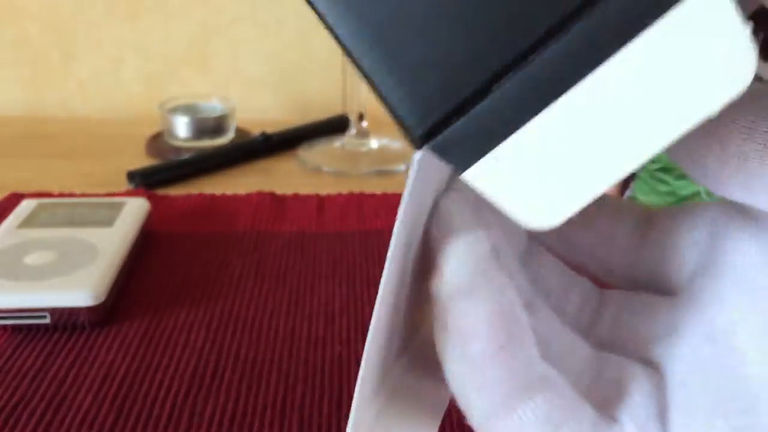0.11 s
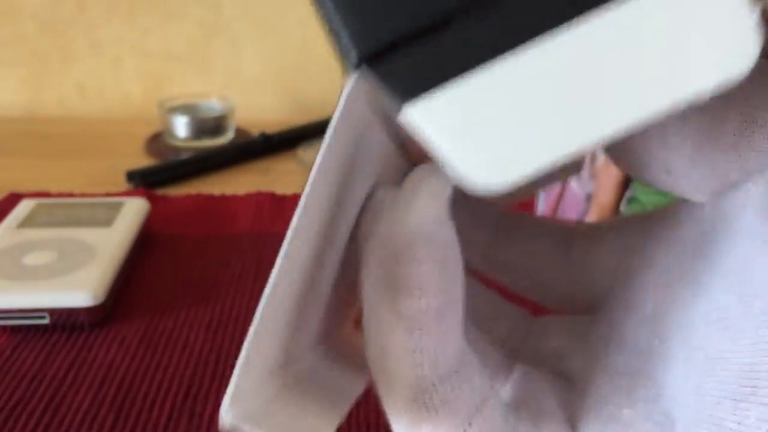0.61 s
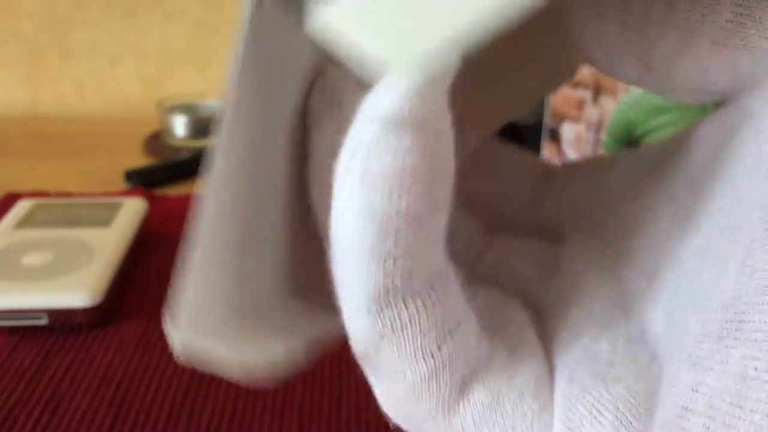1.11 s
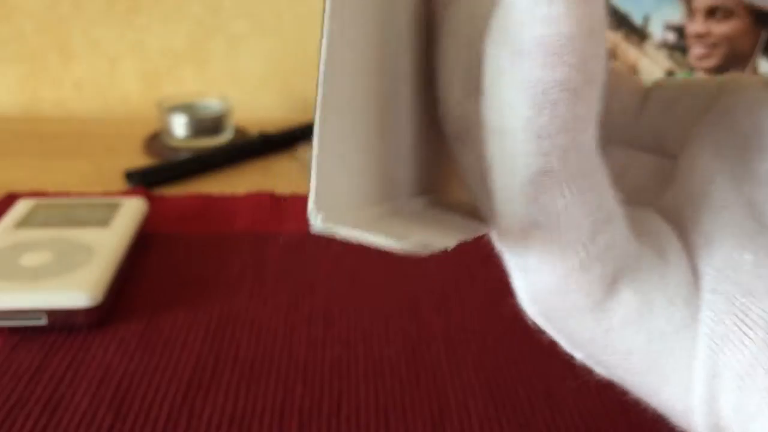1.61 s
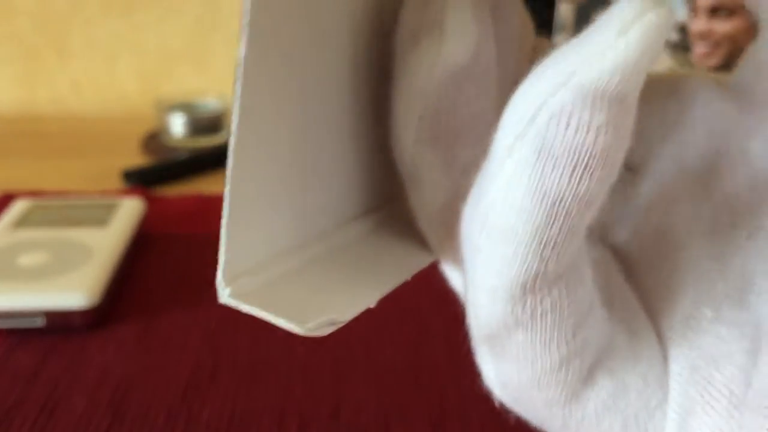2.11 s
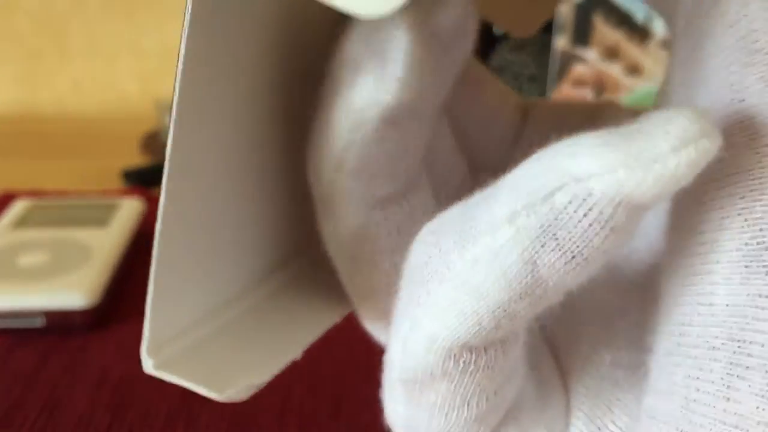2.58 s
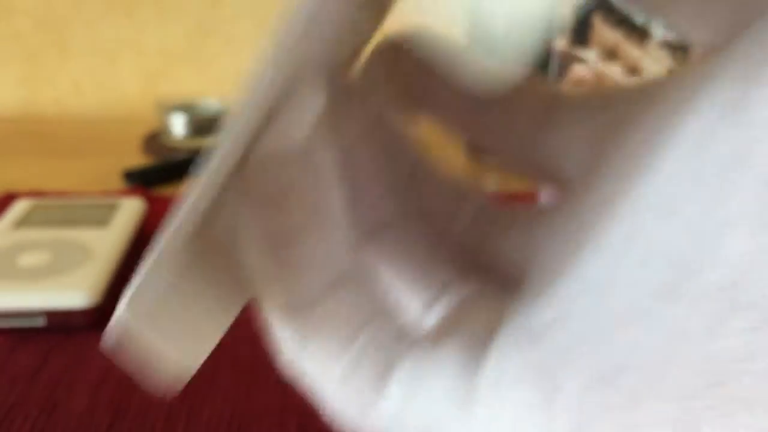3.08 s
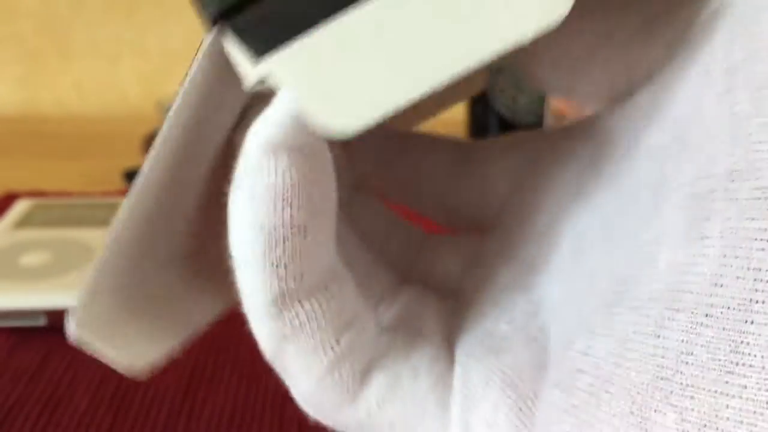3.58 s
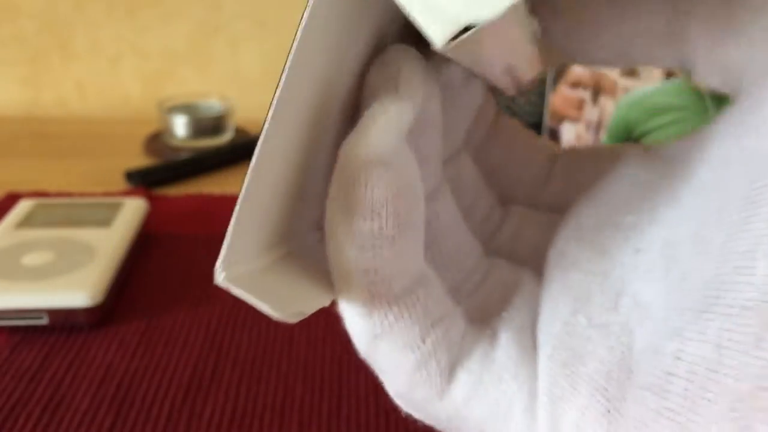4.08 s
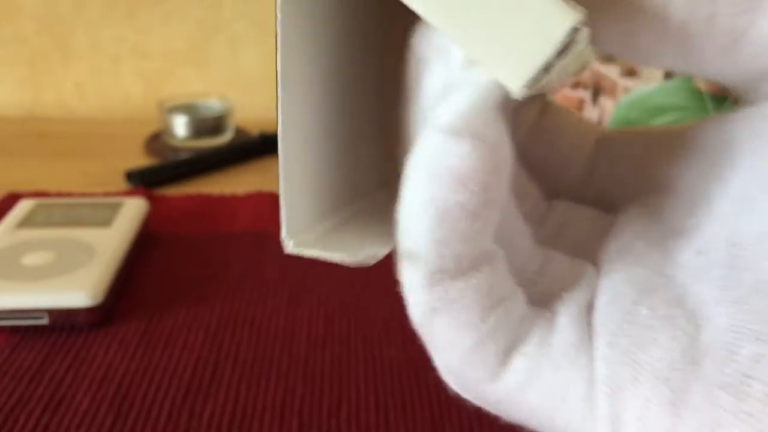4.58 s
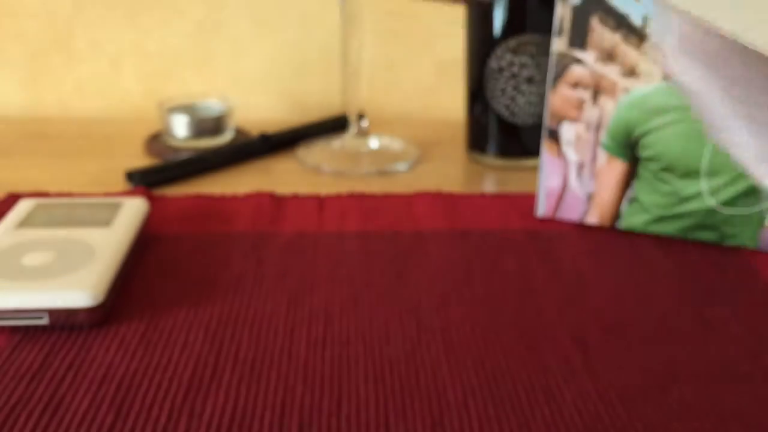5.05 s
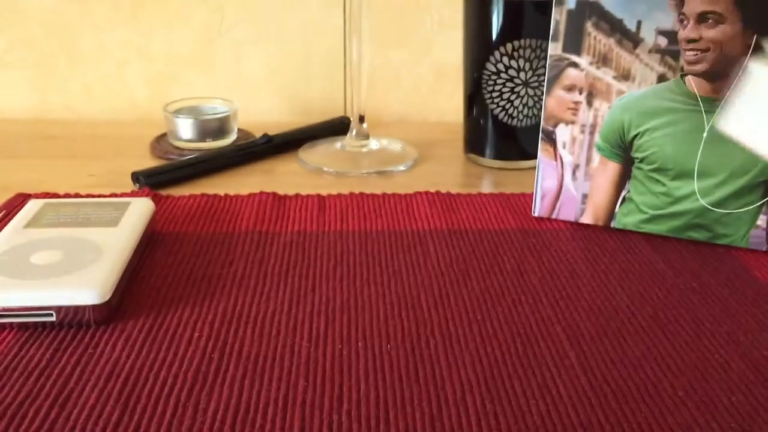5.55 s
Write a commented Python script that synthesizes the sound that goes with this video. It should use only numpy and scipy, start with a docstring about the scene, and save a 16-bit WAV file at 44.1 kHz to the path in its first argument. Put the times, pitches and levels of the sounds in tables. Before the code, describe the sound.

Close, dry scraping and rustling of fabric gloves on a thin card box, broken by muffled knocks and two sharper hollow bumps.

```python
"""Quiet room: cotton-gloved hands work a small cardboard box close to one microphone.
Short rubbing strokes are shaped noise: card and cavity resonances, crackling fibre hiss, drumming panels.
Fingertip knocks and whole-box thumps are decaying sines; snapping edges are brief rings with noise cracks.
A short noise-tail echo and a steady shaped-noise floor surround them."""
import sys
import numpy as np
from scipy import signal
from scipy.fft import rfft, irfft, next_fast_len
from scipy.io import wavfile
from scipy.ndimage import uniform_filter1d, map_coordinates

SR = 44100
rng = np.random.default_rng(int(sys.argv[2]) if len(sys.argv) > 2 else 0)


def wav_record(signal):
    """Record a signal, one row per channel, as 16-bit PCM in the file named by sys.argv[1]."""
    frames = np.transpose(np.atleast_2d(signal))
    bounded = np.clip(frames, -1, 1)
    # unit amplitude maps onto the largest positive 16-bit level
    quanta = np.round(bounded * 32767).astype(np.int16)
    wavfile.write(sys.argv[1], SR, quanta)


def voltage_ratio(decibels):
    """Convert decibels (scalar or array-like) to amplitude ratios, 20 dB per decade."""
    exponent = np.asarray(decibels, float) / 20
    return 10 ** exponent


N = 250488

# glove strokes: full_pressure_start_s, held_s, rub_db, hiss_over_rub_db, drum_db
STROKES = [(0.042, 0.025, -57, 0.5, -64), (0.163, 0.049, -56.5, 9, -51), (0.23, 0.018, -49, 2.5, -49.5),
           (.285, 0.068, -52, 0, -50.5), (0.382, 0.0023, -45.5, -6.5, -44.5), (0.433, 0.045, -51, 1, -54.5),
           (.5, 0.08, -62, -1, -61.5), (0.599, 0.011, -56, -8, -53.5), (0.673, 0.027, -52.5, -0.5, -53),
           (.72, 0.027, -65, 3.5, -63.5), (0.818, 0.042, -55, 2, -48.5), (.915, 0.033, -56.5, 4.5, -48),
           (.965, 0.099, -58.5, -4.5, -59), (1.014, 0.0019, -51.5, -0.5, -43.5),
           (1.107, 0.0011, -43.5, 1, -38), (1.159, 0.03, -49.5, 2, -44), (1.27, 0.023, -52, -1.5, -60),
           (1.57, 0.0064, -64.5, 0, -58), (1.756, 0.081, -67, 5, -68.5), (1.846, 0.0096, -54.5, -11, -58.5),
           (1.995, 0.016, -63, -3, -60), (2.151, 0.11, -54.5, -2, -59), (2.386, 0.011, -82, 8, -58),
           (2.471, 0.055, -66, -5, -58), (2.594, 0.0029, -42.5, -3.5, -36), (2.63, .17, -57, -8, -56),
           (2.674, 0.054, -49, -4.5, -70), (2.818, 0.061, -47.5, 3, -60), (2.886, 0.064, -50.5, 0.5, -60),
           (3.087, 0.072, -48.5, 1, -53.5), (3.16, .002, -42.5, -4, -41), (3.175, 0.021, -56.5, -1, -43),
           (3.215, 0.021, -50.5, -5.5, -54), (3.246, 0.029, -48, -1, -38.5), (3.337, 0.074, -46, -1, -57),
           (3.387, 0.033, -50.5, -1, -41.5), (3.486, 0.012, -49, 0.5, -42), (3.555, 0.031, -54.5, 1, -53),
           (3.59, 0.011, -48, -2, -41.5), (3.658, 0.012, -51.5, -2.5, -45.5), (3.758, 0.016, -59.5, 7, -50),
           (3.828, 0.0053, -59, 2, -45.5), (3.875, .03, -74.5, 14.5, -80), (3.916, 0.0086, -53.5, 2.5, -50),
           (4.05, 0.082, -49, -7, -56.5), (4.149, 0.0057, -54, -9, -54.5), (4.31, 0.064, -58, -5.5, -79),
           (4.476, 0.035, -56, -7.5, -59.5), (4.532, 0.15, -49, -5.5, -62),
           (4.62, 0.017, -47.5, -16, -44.5), (4.66, 0.1, -52.5, -9.5, -66), (4.73, 0.049, -51, -13, -58.5),
           (4.79, 0.14, -58, 0, -64.5), (4.929, 0.047, -51, -3, -58), (4.994, 0.0029, -49, -2.5, -43.5),
           (5.038, 0.02, -51.5, -3.5, -53.5), (5.09, 0.028, -52.5, -10, -62),
           (5.148, 0.0026, -58, 8.5, -48), (5.21, 0.021, -68.5, -11, -55.5), (5.36, .12, -75.5, 7, -92)]
# box panel modes: pitch_hz, relative_level_db, t60_s
PANELS = [(70, -7, 0.042), (134, -1.5, 0.028), (226, -2, 0.039), (290, 0.5, 0.11), (400, -0.5, 0.045),
          (523, -3, 0.025), (590, -1.5, 0.041), (731, -10, 0.026)]


def unit(x):
    """Scale to unit rms."""
    return x / np.sqrt(np.mean(x ** 2) + 1e-20)


def along(points, hz):
    """Interpolate (hz, value) points on a log frequency axis."""
    f, v = np.transpose(points)
    return np.interp(np.log(hz + 1), np.log(f + 1), v)


def filtered(x, response):
    """Multiply the spectrum of x by a complex response of frequency."""
    m = next_fast_len(N + 8192)
    return irfft(rfft(x, m) * response(np.fft.rfftfreq(m, 1 / SR)), m)[:N]


def resonance(f, hz, width_hz):
    """Second-order bandpass response with unit gain at hz."""
    return 1j * f * width_hz / (hz * hz - f * f + 1j * f * width_hz)


def strokes():
    """Glove scrapes card: friction noise excites card and inner air, hisses in the fibres and drums the panels."""
    # grip: start_s, panel_hz, card_hz, hiss_hz, top_edge_tilt_db, hollow_over_rub_db
    grip = [(0, 400, 1680, 3600, -12, -6), (.2, 298, 1700, 5000, 1, -34), (.72, 255, 1380, 4300, -4.5, -13),
            (1.3, 232, 2350, 4400, 4.5, -33), (1.75, 334, 1390, 4400, -9, -3.5),
            (1.84, 266, 1460, 5550, -6, -14), (2.1, 400, 1080, 4970, -7, -35),
            (2.55, 400, 1080, 5740, -9, -1), (2.72, 290, 2220, 5350, 3, -25),
            (2.84, 400, 1130, 5470, -4.5, -7), (2.971, 400, 1180, 5530, 0, -7.5),
            (3.1, 240, 1600, 4470, -1.5, -28.5), (3.6, 248, 1950, 4400, -1.5, -12),
            (3.8, 225, 2150, 5740, 1, -18), (3.9, 230, 1570, 3870, -6, -11),
            (4.05, 400, 1650, 5200, 5, -19), (4.35, 396, 2250, 3430, 3.5, -45),
            (4.52, 430, 1930, 5500, -1, -10.5), (4.8, 417, 1910, 6100, 7, -8.5),
            (5.05, 358, 2190, 5900, 1, -56), (5.22, 194, 1170, 5000, 4, 6.5),
            (5.45, 215, 2870, 2870, 0, -22)]
    # card resonances: centre_hz, width_hz, gain_over_rub_db
    card_modes = [(1185, 260, -8.5), (1705, 99, 1), (2190, 28, -1), (2480, 400, 1.5)]
    # rub spectrum: frequency_hz, relative_density_db
    rub_spectrum = [(500, -3), (800, 4.5), (1500, 2), (3000, -1.5), (4000, -4.5)]
    # hiss spectrum: frequency_hz, relative_density_db
    hiss_spectrum = [(1760, -43), (3000, -4), (3970, -7), (4340, -7), (4880, -13), (5590, -7.5),
                     (9410, -11), (10400, -17), (11300, -13), (14500, -14.5), (15400, -21)]
    rub_db, hiss_over_rub_db, drum_db = np.transpose(STROKES)[2:]
    grip_s, panel_hz, card_hz, hiss_hz, edge_db, hollow_db = np.transpose(grip)

    def near(centre_hz, gain_db, q):
        """Spectral gain peaking at a centre that follows the grip."""
        def favour(f, t):
            centre = np.interp(t, grip_s, centre_hz)
            return 1 + voltage_ratio(gain_db) * abs(resonance(f, centre, centre / q)) ** 2
        return favour

    def card(f):
        modes = sum(voltage_ratio(db) * abs(resonance(f, hz, width)) ** 2 for hz, width, db in card_modes)
        return voltage_ratio(along(rub_spectrum, f)) * (1 + modes)

    force = fibres(rough_db=1.5, rate_hz=480)
    rub = patches(filtered(force, card), near(card_hz, 27, 0.74), patchy_db=4.0)
    hollow = unit(filtered(force, lambda f: resonance(f, 974.0, 102) ** 2))  # air inside the box

    rasp = near(hiss_hz, 6, 5)

    def bright(f, t):
        octaves_up = np.clip(np.log2((f + 1) / 6000), 0, 1)
        return rasp(f, t) * voltage_ratio(np.interp(t, grip_s, edge_db) * octaves_up)

    grains = crackle() * fibres(rough_db=-0.5, rate_hz=820)
    hiss = patches(filtered(grains, lambda f: voltage_ratio(along(hiss_spectrum, f))), bright, patchy_db=4.0)

    def panel_ring(f):
        modes = 0
        for k, (hz, db, t60_s) in enumerate(PANELS):
            width_hz = 3 * np.log(10) / np.pi / t60_s
            modes = modes + (-1) ** k * voltage_ratio(db) * resonance(f, hz, width_hz)
        return modes

    drum = filtered(fibres(rough_db=4, rate_hz=59), panel_ring)
    drum = patches(drum, near(panel_hz, 6.0, 7.8), patchy_db=2.0)

    body = rub + voltage_ratio(np.interp(np.arange(N) / SR, grip_s, hollow_db)) * hollow
    # steeper: (rise, fall) slopes relative to those of the rub
    return (level(rub_db, steeper=(1, 1), creep_over_rub_db=0) * body
            + level(rub_db + hiss_over_rub_db, steeper=(0.82, 1.7), creep_over_rub_db=-3.5) * hiss
            + level(drum_db, steeper=(1.45, 1.08), creep_over_rub_db=-9) * drum)


def fibres(rough_db, rate_hz):
    """Friction force: noise whose size varies at random as fibres catch, rate_hz knots a second."""
    knots = rng.standard_normal(N // 8)
    catch = map_coordinates(knots, [np.arange(N) * rate_hz / SR])
    return unit(rng.standard_normal(N) * voltage_ratio(rough_db * catch))


def crackle():
    """Gain on the friction force: 1 plus sparse random one-millisecond bursts."""
    bursts_per_s, least_db, spread_db = 30, 1, 3
    burst_db = least_db + spread_db * rng.exponential(size=N).clip(0, 2)
    starts = (rng.random(N) < bursts_per_s / SR) * voltage_ratio(burst_db)
    return 1 + signal.fftconvolve(starts, np.hanning(SR // 900))[:N]


def patches(x, favour, patchy_db):
    """Wandering contact spot: a moving favoured region, and random bands that swell and fade."""
    hz, t, z = signal.stft(x, SR, nperseg=1024, noverlap=768)
    field = uniform_filter1d(rng.standard_normal(z.shape), size=9, axis=0)
    field = uniform_filter1d(field, size=11, axis=1)
    shape = favour(hz[:, None], t) * voltage_ratio(patchy_db * unit(field))
    shape /= np.sqrt(np.mean(abs(z) ** 2, 1) @ shape ** 2)  # colour moves, loudness stays
    return unit(signal.istft(z * shape, SR, nperseg=1024, noverlap=768)[1][:N])


def pressure(steeper):
    """Stroke envelopes in dB re peak, 1 ms steps: rise, slow sag, fall; harder strokes rise faster."""
    rise_db_per_s, sag_db_per_s, fall_db_per_s = 460, 10.5, 482  # rise of a usual rub
    usual_rub_db, rise_doubling_db = -60, 21.5
    start_s, held_s, rub_db = np.transpose(STROKES)[:3, :, None]
    t = np.arange(0, N / SR, .001) - start_s
    rise = rise_db_per_s * 2 ** ((rub_db - usual_rub_db) / rise_doubling_db)
    before = steeper[0] * rise * np.minimum(t, 0)
    during = -sag_db_per_s * np.clip(t, 0, held_s)
    after = -steeper[1] * fall_db_per_s * np.maximum(t - held_s, 0)
    return before + during + after


def level(peak_db, steeper, creep_over_rub_db):
    """Gain per sample: powers of all strokes and of the creeping gloves add."""
    # gloves resting and creeping between strokes: time_s, rub_db
    creep = [(0, -90), (.1, -60), (.6, -66.5), (1.2, -58), (1.34, -82), (1.53, -67), (1.74, -76.5),
             (1.92, -95), (2.11, -65), (2.34, -68.5), (2.56, -81), (2.97, -63), (3.45, -57), (3.75, -62),
             (4.0, -75), (4.22, -78), (4.3, -60.5), (4.42, -66.5), (5.19, -63), (5.3, -81), (5.55, -75),
             (5.68, -87)]
    power = np.sum(voltage_ratio(peak_db[:, None] + pressure(steeper)) ** 2, axis=0)
    step_s = np.arange(len(power)) * .001
    creep_s, creep_db = np.transpose(creep)
    gain = np.sqrt(power + voltage_ratio(np.interp(step_s, creep_s, creep_db) + creep_over_rub_db) ** 2)
    return np.interp(np.arange(N) / SR, step_s, gain)


def knocks():
    """Soft fingertip: a decaying sine plus panel modes, strongest nearest its pitch."""
    # fingertip knocks: start_s, level_db, pitch_hz, t60_s
    knock_table = [(.344, -36.5, 401, 0.091), (.363, -42.5, 201, 0.14), (.675, -43.5, 196, 0.1),
                   (.813, -43.5, 229, 0.17), (.84, -39, 224, .1), (.919, -37.5, 186, 0.082),
                   (1.013, -36, 229, 0.083), (1.107, -29.5, 258, 0.083), (1.181, -36, 217.5, 0.11),
                   (1.562, -50.5, 244, 0.056), (1.846, -40, 242, 0.02), (2.379, -49.5, 400, 0.1),
                   (2.596, -24.5, 439, 0.053), (2.599, -21.5, 255, 0.026), (2.696, -40.5, 278, 0.075),
                   (3.162, -21, 206, 0.041), (3.187, -41, 231, 0.096), (3.259, -41, 290, 0.03),
                   (3.275, -32, 226, 0.087), (3.392, -32, 223, 0.026), (3.477, -39, 564, 0.033),
                   (3.663, -36, 224, 0.15), (3.824, -40.5, 216.5, 0.16), (3.923, -46, 226, 0.056),
                   (4.026, -35.5, 379, 0.029), (4.616, -32.5, 426, 0.045), (4.991, -30.5, 418, 0.019),
                   (5.074, -44, 466, 0.11), (5.142, -37, 438, 0.048), (5.142, -35.5, 216, 0.066),
                   (5.211, -45, 190, 0.14)]
    out, t = np.zeros(N + SR), np.arange(SR // 5) / SR
    luck = rng.standard_normal((len(knock_table), len(PANELS)))
    for (start_s, level_db, pitch_hz, knock_t60_s), chances in zip(knock_table, luck):
        ring = voltage_ratio(-60 * t / knock_t60_s) * np.sin(2 * np.pi * pitch_hz * t)
        for (hz, db, t60_s), chance in zip(PANELS, chances):
            distance_octaves = abs(np.log2(hz / pitch_hz))
            mode_db = db - 17.5 - 4.5 * distance_octaves + 1.8 * chance
            ring = ring + voltage_ratio(mode_db - 60 * t / t60_s) * np.sin(2 * np.pi * hz * t)
        attack = 1 - np.exp(-t / 0.0015)
        out[round(start_s * SR):][:len(t)] += voltage_ratio(level_db) * ring * attack
    return out[:N]


def shoves():
    """Box shoved or set down as one piece: a low, soft, decaying sine thump."""
    # shoves: start_s, level_db, thump_hz
    shove_table = [(0.188, -39, 111), (0.361, -38, 72.7), (0.92, -28.5, 85), (.947, -32, 61.5),
                   (1.11, -22, 95), (1.182, -45, 133), (1.298, -42, 106), (1.562, -53, 94),
                   (1.847, -47.5, 126), (1.997, -51, 99), (2.2, -48, 115), (2.378, -59, 90),
                   (2.598, -30.5, 122), (2.694, -46.5, 153), (2.773, -38, 96), (2.841, -43.5, 91),
                   (3.162, -26, 145), (3.187, -26.5, 59.5), (3.39, -35.5, 140), (3.419, -31, 56.5),
                   (3.477, -53, 70), (3.744, -41, 51.1), (3.924, -35, 114), (4.06, -40.5, 85),
                   (4.617, -46, 134), (4.991, -37.5, 154), (5.072, -39.5, 149), (5.14, -39, 150),
                   (5.211, -45, 136)]
    attack_s, t60_s = 0.0059, 0.075
    out, t = np.zeros(N + SR), np.arange(SR // 5) / SR
    attack = 1 - np.exp(-t / attack_s)
    for start_s, level_db, thump_hz in shove_table:
        thump = voltage_ratio(level_db - 60 * t / t60_s) * np.sin(2 * np.pi * thump_hz * t)
        out[round(start_s * SR):][:len(t)] += thump * attack
    return out[:N]


def snaps():
    """Edge snapping free: a burst of a few milliseconds, broad noise crack plus stiff ring."""
    # snaps, levels ahead of the output filter: start_s, level_db, pitch_hz, crack_over_ring_db
    snap_table = [(0.378, -35, 1850, -13), (1.1038, -39, 3230, 6), (1.113, -35, 1800, -20),
                  (1.2702, -40, 1730, -14), (1.8462, -33.5, 4500, -1), (2.131, -44, 1240, -8),
                  (2.581, -46, 1150, -5), (2.592, -34.5, 5950, 6), (2.5967, -19.5, 830, -21),
                  (2.6365, -32.5, 1650, 1.5), (2.649, -48, 1320, -2), (3.022, -38.5, 1160, -21),
                  (3.1614, -39, 2190, 7), (3.1605, -27, 1530, -6), (3.1914, -29.5, 1570, -5),
                  (3.4097, -32, 1450, -12), (3.9709, -46.5, 2210, -3), (4.0411, -36.5, 1720, 1.5),
                  (4.0585, -30.5, 1740, -1.5), (4.1518, -28.5, 1200, -18), (4.1573, -34, 1500, -5),
                  (4.277, -45.5, 1670, -20), (4.432, -38, 2150, -6), (4.432, -42, 6200, -13),
                  (4.441, -34.5, 1820, -10), (4.9897, -31.5, 1330, -15), (5.206, -35, 880, -5.5)]
    out, t = np.zeros(N + SR), np.arange(SR // 60) / SR
    noise = rng.standard_normal((len(snap_table), len(t)))

    def burst(rise_s):
        return t / rise_s * np.exp(1 - t / rise_s)

    for (start_s, level_db, pitch_hz, crack_db), grain in zip(snap_table, noise):
        ring = burst(.0008) * np.sin(2 * np.pi * pitch_hz * t)
        crack = voltage_ratio(crack_db) * burst(.0006) * grain
        out[round(start_s * SR):][:len(t)] += voltage_ratio(level_db) * (ring + crack)
    return filtered(out[:N], lambda f: resonance(f, 4050, 7600) / (1 + 1j * f / 7000))


def echo(x):
    """Table and near walls: convolution with a short decaying noise tail of unit energy."""
    t60_s = 0.071
    t = np.arange(SR // 4) / SR
    tail = rng.standard_normal(len(t)) * voltage_ratio(-60 * t / t60_s)
    return signal.fftconvolve(x, tail / np.linalg.norm(tail))[:N]


def room():
    """Still air and microphone hiss: steady shaped noise."""
    # floor spectrum: frequency_hz, relative_density_db
    floor_spectrum = [(26, -25), (45, 6), (492, -6.5), (584, -5.5), (864, -10), (1100, -13), (1310, -8),
                      (1440, -16.5), (13300, -24.5), (15400, -30)]
    rms_db = -69.5
    noise = filtered(rng.standard_normal(N), lambda f: voltage_ratio(along(floor_spectrum, f)))
    return voltage_ratio(rms_db) * unit(noise)


def scene():
    """Box, its echo and the room floor, alike in two channels."""
    box = strokes() + knocks() + shoves() + snaps()
    walls = voltage_ratio(-15) * echo(box)
    return np.tile(box + walls + room(), (2, 1))


def band_limit(x):
    """A steep low-pass at the top of the band."""
    return signal.sosfilt(signal.butter(12, 15480, fs=SR, output="sos"), x)


def record(dry):
    """One microphone, deaf to the deepest bass (four 30 Hz high-pass poles), feeds both channels."""
    heard = filtered(dry[0], lambda f: (1j * f / (1j * f + 30)) ** 4)
    return band_limit(np.tile(heard, (2, 1)))


dry = scene()
out = record(dry)
wav_record(out)
```